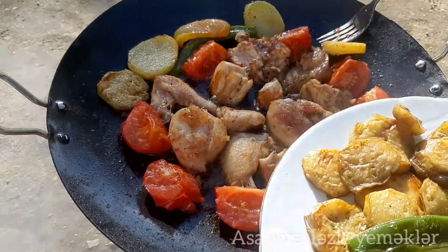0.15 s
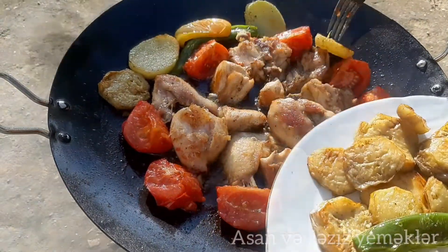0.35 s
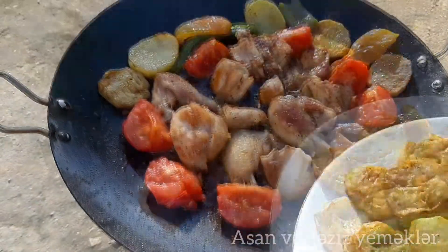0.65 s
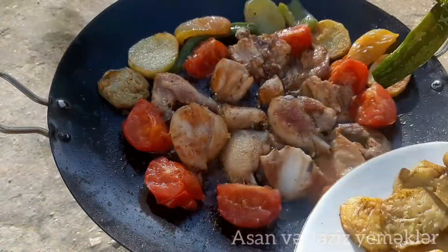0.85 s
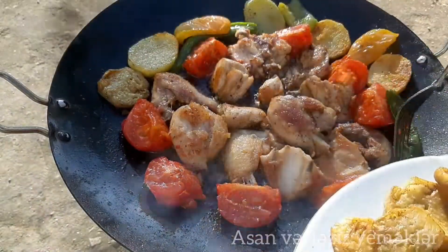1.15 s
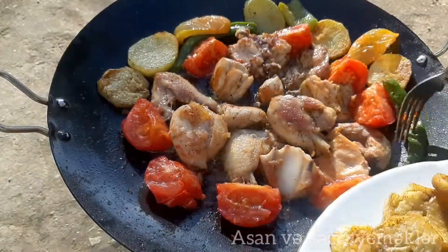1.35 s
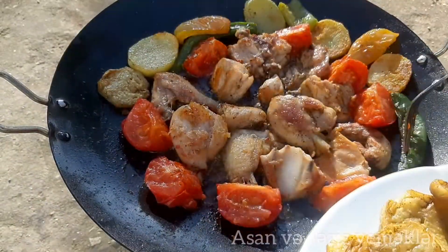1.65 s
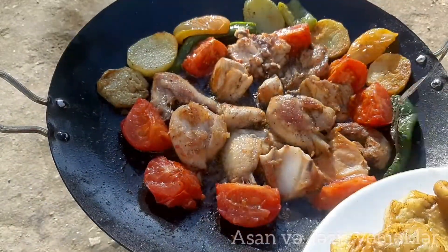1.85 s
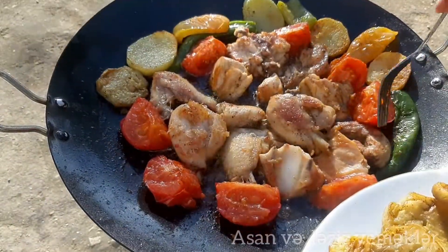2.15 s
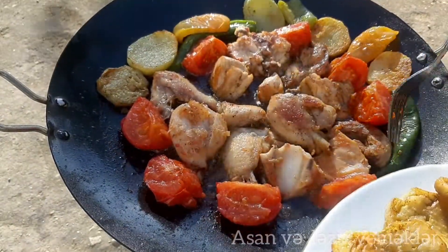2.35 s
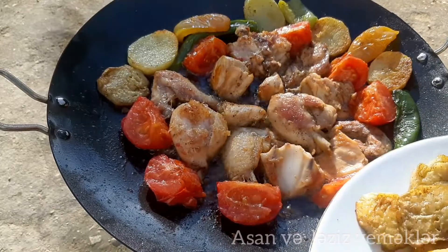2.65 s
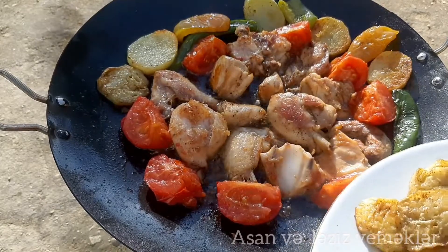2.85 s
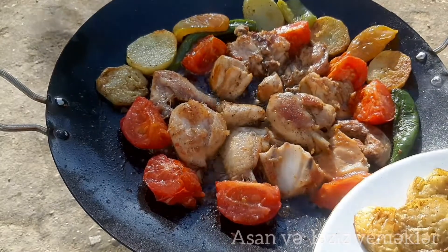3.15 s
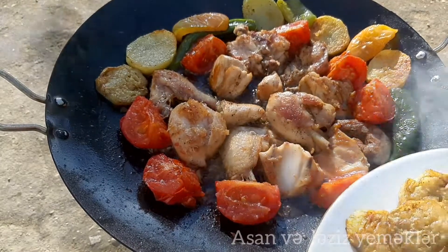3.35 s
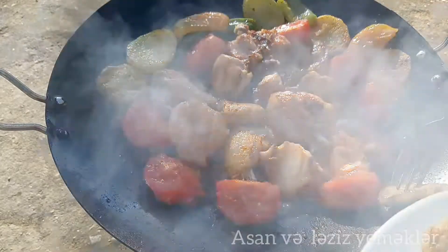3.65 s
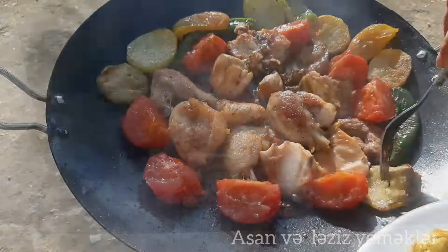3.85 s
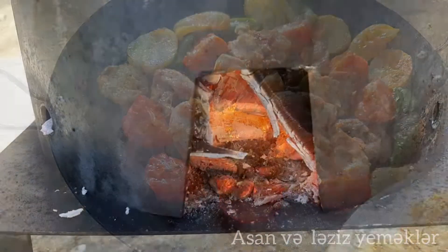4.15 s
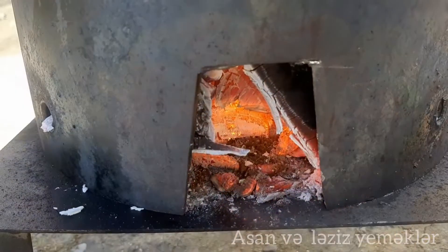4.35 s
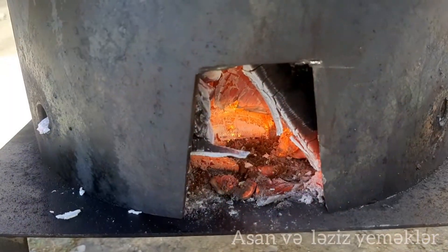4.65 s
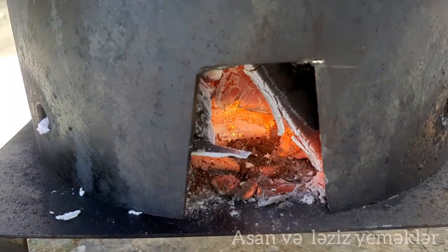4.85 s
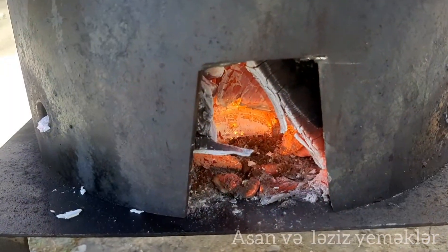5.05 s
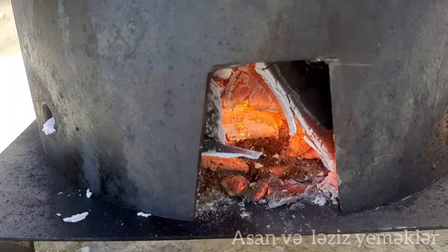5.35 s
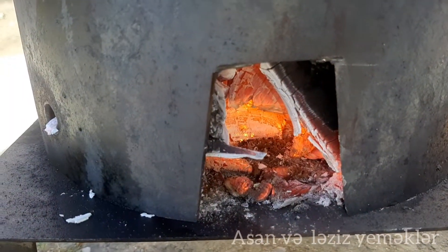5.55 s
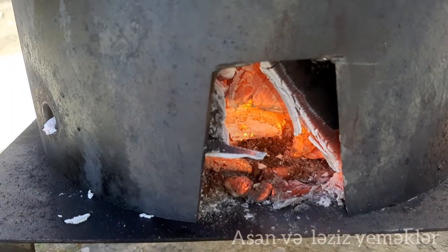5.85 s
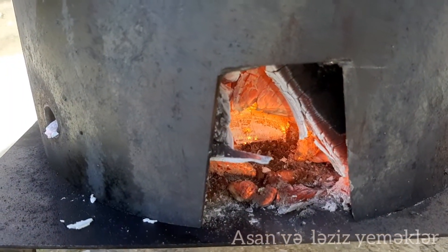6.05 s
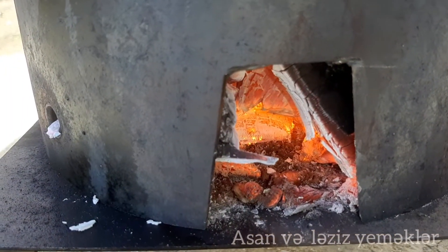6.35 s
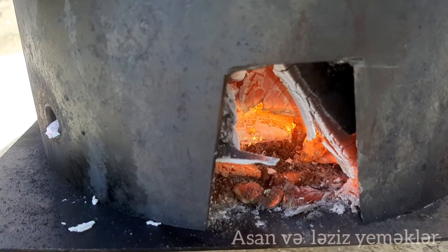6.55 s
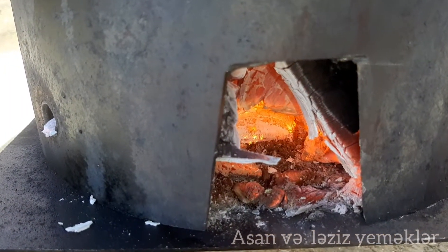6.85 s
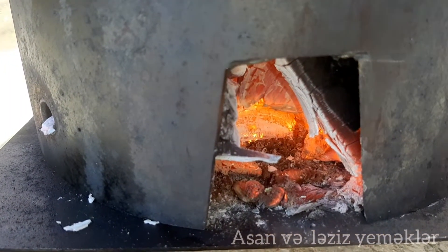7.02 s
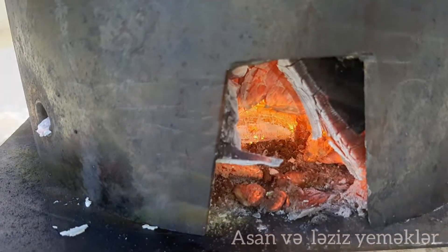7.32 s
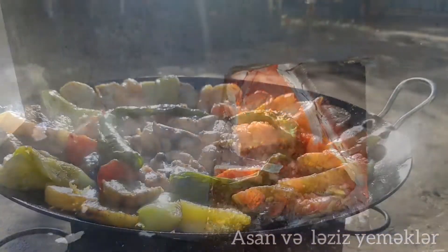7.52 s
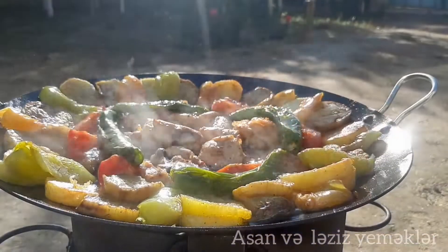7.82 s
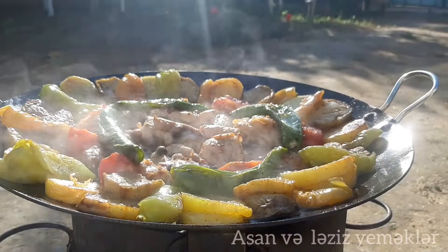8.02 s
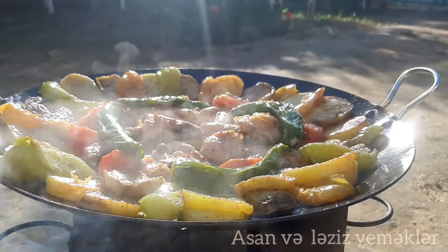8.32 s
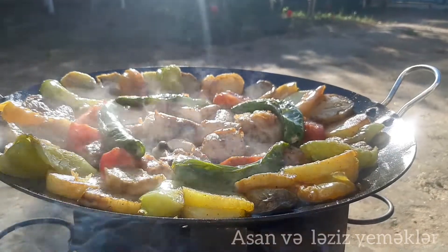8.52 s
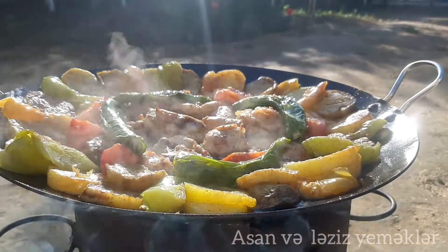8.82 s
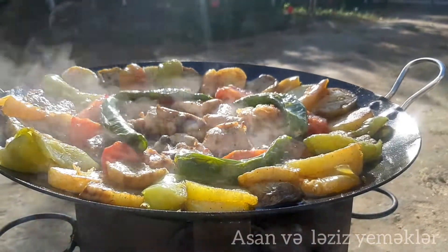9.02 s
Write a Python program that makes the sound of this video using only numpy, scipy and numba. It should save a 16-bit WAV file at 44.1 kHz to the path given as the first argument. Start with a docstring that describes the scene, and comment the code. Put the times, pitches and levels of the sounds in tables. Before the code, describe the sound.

Outdoors, close to a wide iron pan, oil sizzles thinly while a fork clanks once, hard, then knocks more softly. Pops cluster around the third second. The frying then comes forward, denser and crackly, with wind rumbling into the left of a handheld stereo microphone. At the end the gusts calm, the sizzle brightens and rises, and sharp spits stand out over a barely audible distant engine.

```python
"""Outdoors over a wood fire: food fries in an iron pan, heard by a two-port phone from three places in turn.
Steam bubbles in the oil are damped tones over a hiss that they lift; the louder ones are bursts of noise.
A fork taps the pan and a plate, exciting decaying modes; gusts send low pressure dips into each port.
Far off an engine drones as a harmonic series of gliding sines."""
import sys
import numpy as np
from scipy import signal
from scipy.fft import rfft, irfft, next_fast_len
from scipy.io import wavfile
from scipy.ndimage import uniform_filter1d
from numba import njit

SR = 44100
rng = np.random.default_rng(int(sys.argv[2]) if len(sys.argv) > 2 else 0)


def generate_wav(sig):
    """Save sig (samples, or channels by samples) to the path in sys.argv[1] as 16-bit PCM at SR."""
    pcm = np.round(np.clip(np.atleast_2d(sig).T, -1, 1) * 32767).astype(np.int16)
    wavfile.write(sys.argv[1], SR, pcm)


N = 404838

TOP_HZ = 15780  # upper band limit of the phone
SIZE = next_fast_len(N + SR // 4)  # transform length, with room for tails
HZ = np.arange(SIZE // 2 + 1) * SR / SIZE
TIME = np.arange(N) / SR


def undb(db):
    """Level to amplitude ratio: 20 dB per factor of ten."""
    return 10 ** (np.asarray(db) / 20)


def unit(x):
    """Normalisation to an effective (rms) value of 1."""
    return x / np.sqrt(np.mean(x ** 2))


def walk(rate):
    """Low-passed random process: levels held 1 / rate s, averaged twice; spread near 1."""
    hold = int(SR / rate)
    steps = np.repeat(rng.standard_normal(N // hold + 1), hold)
    return 1.3 * uniform_filter1d(uniform_filter1d(steps, hold), hold)[:N]


def causal(hz, db):
    """Minimum-phase principle: folding the cepstrum of a gain curve gives its causal response."""
    half = 1024
    grid = np.arange(half + 1) * SR / (2 * half)
    log_gain = np.interp(np.log(grid + 1), np.log(hz), db) * np.log(10) / 20
    cepstrum = irfft(log_gain)
    cepstrum[1:half] *= 2
    cepstrum[half + 1:] = 0
    return rfft(irfft(np.exp(rfft(cepstrum))), SIZE)


def add(out, x, s):
    """Superposition: x joins out at s seconds."""
    i = int(s * SR)
    out[..., i:i + x.shape[-1]] += x[..., :N - i]


@njit
def bubbles(at, step, fall, size, phase, length):
    """Damped oscillation: each bubble is a short decaying tone, its phase independent in three feeds."""
    out = np.zeros((3, length + 1024))
    for k in range(len(at)):
        turn = fall[k] * np.exp(1j * step[k])
        for feed in range(3):
            z = size[k] * np.exp(1j * phase[k, feed])
            for i in range(at[k], at[k] + min(1024, int(-5 / np.log(fall[k])))):
                out[feed, i] += z.imag
                z *= turn
    return out[:, :length]


def frying(strength_db, count=8000, spread_db=4, most_db=11, low_hz=500, span_oct=3.7, ring_ms=1.41,
           bubble_db=-7, puff_db=-12, puff_ms=9.6, reach_oct=2.0):
    """Shot noise: ringing bubbles over a hiss each lifts near its pitch; feeds shared, left only, right only."""
    chance = rng.random((count, 7))
    at = ((np.arange(count) + chance[:, 0]) * N / count).astype(np.int64)  # an even patter
    pitch = np.log2(low_hz) + span_oct * chance[:, 1]  # octaves above 1 Hz
    # many small bubbles, few large ones, none past a largest size
    size_db = most_db * np.tanh(-spread_db * np.log(chance[:, 2]) / most_db)
    size = undb(size_db + strength_db[at])
    ring = ring_ms * 2 ** (2 * chance[:, 3] - 1) * SR / 1000  # decay constant in samples
    step = 2 * np.pi * 2 ** pitch / SR
    phase = 2 * np.pi * chance[:, 4:]
    tones = bubbles(at, step, np.exp(-1 / ring), size / np.sqrt(ring), phase, N)

    hiss = rfft(rng.standard_normal((3, N)), SIZE)
    centres = np.arange(8, 14.1, 1.5)  # band centres, octaves above 1 Hz
    octave = np.clip(np.log2(HZ + 1), centres[0], centres[-1])
    seethe = walk(19)
    seethe = unit(seethe - uniform_filter1d(seethe, size=SR // 8))  # quick flutter, no slow surges
    out = undb(bubble_db + 0.28 * seethe) * unit(tones)
    for centre in centres:
        distance = np.clip((octave - centre) / (centres[1] - centres[0]), -1, 1)
        share = np.cos(np.pi / 2 * distance) ** 2
        nearness = np.exp(-((pitch - centre) / reach_oct) ** 2)
        puffs = np.bincount(at, (undb(puff_db) * size) ** 2 * nearness, N)
        # the energy of each puff dies away exponentially
        lift = np.sqrt(1 + signal.lfilter([1], [1, -np.exp(-1000 / (puff_ms * SR))], puffs))
        envelope = unit(lift * undb(0.81 * seethe + 0.3 * walk(40)))
        out = out + envelope * irfft(hiss * share, SIZE)[:, :N]
    return out


# Sizzle spectrum looking down on the pan: (f/Hz, left relative level/dB, right relative level/dB,
# likeness of the ports 0-1)
ABOVE_PAN = [(119, 4.5, 2, 0.5), (252, -4, -2, 0.64), (676, -2, -1, 1), (920, -8, -7.5, 0.73),
             (1310, -7.5, -7, 0.4), (1780, -4, -4.5, 0.4), (2190, -3.5, -5.5, 0.22), (2940, -6.5, -5, 0.03),
             (3670, 2, 0.5, 0.99), (5900, -9.5, -8.5, 0.18), (7530, -8.5, -10, 0), (8600, -17, -16.5, 1),
             (12000, -14.5, -16, 0.99), (15900, -18, -16.5, 0.98)]
# The same from below the rim: (f/Hz, left relative level/dB, right relative level/dB, likeness 0-1)
BY_FIREBOX = [(121, -1, -12, 1), (410, -11, -10.5, 0.66), (560, -17.5, -20.5, 0.77),
              (1145, -10.5, -11.5, 0.74), (1310, -14.5, -16.5, 0.17), (2040, 3, -5, 0.47),
              (2150, -12, -5, 0.61), (2530, -0.5, -1.5, 0.15), (3700, -2, -2, 0.035), (6070, -12, -5, 0.18),
              (7600, -9.5, -21, 0.12), (9050, -20, -30, 0.77), (11650, -20, -17.5, 1),
              (17400, -21, -27, 0.96)]
# The same level with the rim: (f/Hz, left relative level/dB, right relative level/dB, likeness 0-1)
BESIDE_PAN = [(120, -7.5, -4, 1), (317, -2.5, -7, 0.86), (660, -4.5, -3.5, 1), (870, -11.5, -10.5, 0.28),
              (1250, -8.5, -5, 0.92), (1950, -2, -5, 0.35), (2410, 3, 5, 0.26), (2710, 2.5, 3.5, 0.044),
              (3920, 1.5, 2, 0.95), (4870, -0.5, 7, 0.18), (7580, -5, -13, 0.089), (8850, -15.5, -44, 0.14),
              (10900, -14.5, -18, 0.83), (15700, -25.5, -26, 1)]
# Narrow resonances (+) and notches (-), one list a place: (f/Hz, width/Hz, level/dB)
NARROWS = [
    [(1620, 170, 3.5), (2980, 290, 6)],
    [(410, 51, 3.5), (1960, 350, 1), (2170, 220, -5), (2484, 88, 4.5), (2860, 160, -5), (4040, 71, 4.5),
     (5040, 210, 3), (7600, 190, -0.5)],
    [(1890, 96, -6), (3380, 540, -2), (4570, 480, 0.5), (5270, 350, -8), (6600, 400, 3.5)],
]
# Listening places: (dissolve start t/s, dissolve end t/s, left port delay/samples, burst level/dB,
# near echo delay/ms, echo gain, level/dB of the air above 8 kHz relative to the sizzle)
PLACES = [(-1, 0.75, -3.5, 1.5, 0.72, 0.0083, 0.5), (3.8, 4.3, -5, 1, 1.22, 0.029, 3),
          (7, 8.69, -8.5, -3, 1.76, 0.3, 6)]
# Overall course of the sizzle: (t/s, level/dB)
SIZZLE = [(0, -52), (.3, -55.5), (.55, -57), (.97, -52), (2.68, -49), (2.99, -47.5), (3.3, -49.5),
          (3.8, -50.5), (4.0, -49), (4.2, -44), (4.5, -39.5), (5.3, -41), (6.6, -39), (7.1, -41.5),
          (7.47, -45.5), (9.18, -37)]
AIR_HOLDS = 0.25  # share of each level swing that the air above 8 kHz does not follow
AIR_FLICKER_DB, AIR_FLICKER_PER_S = 1.5, 70  # quick flutter of that air


def sizzle():
    """Partial coherence: the frying, filtered and delayed to each port; places dissolve into each other."""
    start, end, lags, burst_db, echo_ms, echo, place_air_db = np.transpose(PLACES)
    enter = [np.clip((TIME - a) / (b - a), 0, 1) for a, b in zip(start, end)] + [0 * TIME]
    weight = [enter[k] - enter[k + 1] for k in range(3)]
    strength_db = sum(w * db for w, db in zip(weight, burst_db))
    shared, left, right = rfft(frying(strength_db), SIZE)

    level_db = np.interp(TIME, *np.transpose(SIZZLE))
    air_db = sum(w * db for w, db in zip(weight, place_air_db))
    air_db = air_db - AIR_HOLDS * (level_db - level_db.mean())
    air_db = air_db + AIR_FLICKER_DB * walk(AIR_FLICKER_PER_S)
    air = np.clip((HZ - 6500) / 2500, 0, 1)  # fades in around 8 kHz

    mix = 0
    colours = (ABOVE_PAN, BY_FIREBOX, BESIDE_PAN)
    for table, narrows, lag, ms, gain, w in zip(colours, NARROWS, lags, echo_ms, echo, weight):
        hz, left_db, right_db, alike = np.transpose(table)
        alike = np.clip(np.interp(HZ, hz, alike), 0, 1)
        # the delay between the ports holds below the top octave only
        late = np.exp(-2j * np.pi * HZ * lag / SR * (1 - air))
        at_left = np.sqrt(alike) * shared * late + np.sqrt(1 - alike) * left
        at_right = np.sqrt(alike) * shared + np.sqrt(1 - alike) * right
        pair = np.array([causal(hz, left_db) * at_left, causal(hz, right_db) * at_right])
        pair = pair * undb(sum(db / (1 + (2 * (HZ - f) / width) ** 2) for f, width, db in narrows))
        # a nearby surface sends a dull echo that combs the lower middle
        reflection = gain * np.exp(-2j * np.pi * HZ * ms / 1000 - (HZ / 4000) ** 2)
        pair = irfft(pair * (1 + reflection), SIZE)[:, :N]
        mix = mix + np.sqrt(w) * unit(pair)
    top = irfft(rfft(mix, SIZE) * air, SIZE)[:, :N]
    return undb(level_db) * (mix - top + undb(air_db) * top)


# chance snaps: level above the sizzle, spread of sizes, lowest pitch and range of pitches
SNAP_ABOVE_DB, SNAP_SPREAD_DB, SNAP_LOW_HZ, SNAP_SPAN_OCT = 12, -7, 1220, 3.84


def snaps(count=150):
    """Random point process: chance bursts as rows like POPS, until the second place has fully entered."""
    when, size, pitch = rng.random((count, 3)).T
    when = when * PLACES[1][1]
    hz = SNAP_LOW_HZ * 2 ** (SNAP_SPAN_OCT * pitch)
    colour = np.transpose(ABOVE_PAN)
    size_db = 6 * np.tanh(-SNAP_SPREAD_DB * np.log(size) / 6)
    colour_db = np.interp(hz, colour[0], colour[1:3].mean(axis=0))
    sizzle_db = np.interp(when, *np.transpose(SIZZLE))
    return list(zip(when, sizzle_db + SNAP_ABOVE_DB + size_db + colour_db, hz))


def peak(x):
    """Normalisation to a peak value of 1 at each port."""
    return x / np.abs(x).max(axis=-1, keepdims=True)


def around(hz, octaves, x):
    """Band-pass filtering: x within so many octaves either side of hz."""
    edges = np.minimum(hz * 2 ** np.array([-octaves, octaves]), TOP_HZ)
    return signal.sosfilt(signal.butter(3, edges, "band", fs=SR, output="sos"), x)


# Loud single bubbles: (t/s, peak level/dB, centre f/Hz)
POPS = [(0.559, -55, 600), (0.611, -47, 7600), (0.672, -48, 890), (0.815, -39, 1690), (0.8819, -40, 3150),
        (0.906, -42, 1200), (1.738, -44, 590), (1.787, -39, 660), (1.82, -34.5, 1570), (1.859, -41, 785),
        (1.999, -41, 10900), (2.09, -46, 7500), (2.297, -45, 900), (2.345, -42, 650), (2.372, -46, 8000),
        (2.39, -33.5, 2000), (2.452, -44, 7500), (2.646, -42, 7600), (2.708, -41.5, 7100),
        (2.816, -57, 11600), (2.837, -35.5, 1960), (2.871, -46, 3600), (2.8928, -37, 2600),
        (2.9372, -38, 3100), (2.946, -35.5, 3500), (2.974, -39, 3400), (2.981, -40, 3300),
        (3.003, -40, 3000), (3.015, -35, 3280), (3.0216, -35.5, 1400), (3.074, -37, 2500),
        (3.099, -36, 1380), (3.1512, -38.5, 1800), (3.2171, -38, 3650), (3.415, -44, 10300),
        (3.4814, -34, 2830), (3.4914, -52, 4500), (3.505, -38, 7000), (3.532, -42, 10900),
        (3.6471, -36.5, 1630), (3.736, -37, 7400), (3.937, -39, 2600), (4.125, -41, 1920),
        (4.2, -44.5, 1900), (4.472, -34, 1870), (4.503, -34, 1900), (4.546, -36.5, 1710),
        (4.6945, -32, 1980), (4.8234, -19.5, 2960), (4.869, -34, 1890), (4.913, -32, 4800),
        (5.017, -33, 1800), (5.113, -36, 1900), (5.1484, -35, 1950), (5.172, -31.5, 1820),
        (5.7806, -27.5, 2670), (6.233, -32, 2400), (6.263, -28, 1940), (6.283, -32, 1900),
        (6.3012, -28, 4900), (6.326, -31, 2500), (6.2996, -26.5, 2900), (6.3786, -30, 2700),
        (6.765, -34, 3130), (7.0656, -34, 1850), (7.3178, -33.5, 1860), (7.4034, -30, 1850),
        (7.4484, -38, 1190), (7.7567, -38, 4830), (7.943, -36, 7000), (8.0022, -43, 3000),
        (8.2975, -49, 2820), (8.4058, -42, 2400), (8.4417, -56, 4230), (8.547, -40, 2444),
        (8.7984, -28.5, 4250), (8.808, -31, 2820), (8.8992, -31, 5000), (9.0075, -34, 4800),
        (9.0336, -21, 5300), (9.0337, -31, 2800), (9.043, -28, 4940)]


def pops(near_oct=0.43, far_oct=0.26, near_ms=13, far_ms=14, alike=0.63, crack=4, skirt_db=-14, skirt_ms=4,
         thump_db=-5, thump_hz=670):
    """Impulsive excitation: each bubble is band noise with a wide tick; from above, low ones thump the pan."""
    out, t = np.zeros((2, N)), np.arange(2000) / SR

    def fade(ms):
        """Exponential decay: 60 dB in ms."""
        return np.exp(-np.log(1000) * t * 1000 / ms)

    for s, db, hz in list(POPS) + snaps():
        above = s < PLACES[1][0]
        width_oct, ring_ms = (near_oct, near_ms) if above else (far_oct, far_ms)
        both, *own = rng.standard_normal((3, len(t)))
        both[0] = crack  # the skin of the bubble tears at once
        tear = alike * both + (1 - alike) * np.array(own)
        burst = peak(around(hz, width_oct, tear * fade(ring_ms)))
        burst += undb(skirt_db) * peak(around(hz, 1.1, tear * fade(skirt_ms)))
        if above and hz < 3150:
            burst += undb(thump_db) * np.sin(2 * np.pi * thump_hz * t) * fade(19)
        add(out, peak(burst) * undb(db), s)
    return out


# Modes of the pan, struck at the rim: (f/Hz, width/Hz, relative level/dB)
PAN_RIM = [(307, 67, -13), (506, 110, -17), (710, 120, -13), (915, 57, 2), (1073, 120, 5), (1390, 69, -16),
           (1615, 27, -10.5), (1910, 61, -3.5), (2500, 115, -1), (2770, 130, -1.5), (3430, 110, 1),
           (3900, 90, 1.5), (4270, 80, -13), (5270, 130, -1), (5600, 120, -1), (5820, 100, 3.5),
           (5950, 110, -4), (6550, 95, -4), (7000, 88, -5), (7630, 120, 3.5), (7780, 110, 6.5),
           (9300, 130, -3), (11220, 98, -10), (12350, 120, -3), (12800, 200, -11), (13600, 150, 5),
           (14100, 120, 0), (15470, 170, -1)]
# Modes of its belly: (f/Hz, width/Hz, relative level/dB)
PAN_BELLY = [(2940, 110, -1.5), (3370, 110, -3), (4160, 51, 0), (4720, 200, -4), (5750, 88, -8),
             (6380, 110, 3.5), (7700, 74, -6), (7750, 100, -12), (8750, 110, -16), (8900, 97, -17),
             (11240, 96, -13.5), (12720, 85, -12), (13080, 110, -11), (14780, 140, -15)]
# Low modes of its bowl: (f/Hz, width/Hz, relative level/dB)
PAN_BOWL = [(328, 74, 8.5), (462, 61, 3.5), (815, 59, 3.5), (1020, 59, -7), (1340, 90, -14)]
# Broad modes of its edge: (f/Hz, width/Hz, relative level/dB)
PAN_EDGE = [(467, 100, 3), (637, 120, 0.5), (1100, 280, -11), (2560, 200, -10), (3680, 190, -2),
            (3100, 300, -6), (5430, 300, -12), (6720, 250, -12)]
# Modes of the plate: (f/Hz, width/Hz, relative level/dB)
PLATE = [(1760, 40, -3), (3240, 500, 10), (3650, 400, 5), (6900, 150, 6.5)]
# Modes of a fork tine: (f/Hz, width/Hz, relative level/dB)
TINE = [(3160, 100, 4), (6180, 110, -10)]
# Fork contacts: (t/s, level/dB over the loudest 10 ms, softness/ms, length of the rub/ms,
# after-sound level/dB before it is dulled, modes of what is struck)
TAPS = [(0.2419, -15, 0.011, 1, -31.5, PAN_RIM), (0.340, -51, .4, 3.1, -27, PLATE),
        (1.342, -27.5, 0.016, 3, -34, PAN_BELLY), (1.3428, -30.5, 0.065, 3.7, -38, PAN_BOWL),
        (1.508, -36, 0.03, 1.9, -35, PAN_EDGE), (2.952, -42.5, 0.088, 36, -40, PLATE),
        (3.758, -40.5, 0.078, 12, -26, TINE)]


def taps(chatter_db=-28, chatter_ms=3, wash_ms=17, blur_db=-11, slip=0.63, lag_ms=0.042):
    """Modal superposition: a fork strike or rub drives decaying modes, then chatter and a diffuse tail."""
    out, t = np.zeros((2, N)), np.arange(SR // 8) / SR
    for s, db, soft_ms, rub_ms, wash_db, body in TAPS:
        hz, width, mode_db = np.array(body).T[..., None]
        # while the contact lasts each mode swells, unevenly as the metal slips; then it dies away
        push = np.sin(np.pi * np.clip(t * 1000 / rub_ms, 0, 1)) ** 2
        swell = signal.fftconvolve(np.exp(-np.pi * width * t), push[None], axes=1)[:, :len(t)]
        slips = rng.standard_normal((len(hz), len(t) // 64 + 1)).repeat(64, axis=1)[:, :len(t)]
        swell = undb(mode_db) * swell * (1 + slip * push * uniform_filter1d(slips, size=32))
        # modes below 10 kHz oscillate a little later at the left port
        left_time = np.maximum(t - (hz < 10000) * lag_ms / 1000, 0)
        ring = np.array([(swell * np.sin(2 * np.pi * hz * u)).sum(axis=0) for u in (left_time, t)])
        # tail noise: lows and top alike at both ports, the middle different
        jolts = rng.standard_normal((4, len(t)))
        apart = jolts[:2] - jolts[2]
        tail_noise = jolts[2] + uniform_filter1d(apart, size=4) - uniform_filter1d(apart, size=21)
        fade = undb(chatter_db) * np.exp(-t * 1000 / chatter_ms) * tail_noise
        # the after-sound of the ground and stove is dull
        fade += undb(wash_db) * np.exp(-t * 1000 / wash_ms) * uniform_filter1d(tail_noise, size=3)
        ring += signal.fftconvolve(ring, fade, axes=1)[:, :len(t)]
        # bright noise follows the envelope of the ring
        blur = signal.lfilter([1, -1], [1, -.85], jolts[3])
        ring += undb(blur_db) * uniform_filter1d(np.abs(ring), size=64, origin=31) * blur
        keep = np.exp(-1000 / (soft_ms * SR))  # a softer contact pushes longer and dulls the ring
        ring = signal.lfilter([1 - keep], [1, -keep], ring)
        # the struck body radiates little below its lowest mode
        ring = signal.sosfilt(signal.butter(3, 0.9 * hz.min(), "high", fs=SR, output="sos"), ring)
        loudest = np.sqrt(uniform_filter1d(np.mean(ring ** 2, axis=0), size=SR // 100).max())
        add(out, ring * undb(db) / loudest, s)
    return out


# Steady wind on the ports: (t/s, left level/dB, right level/dB)
GUSTS = [(0, -62, -59), (.4, -54.5, -60), (.6, -82, -80), (.9, -48, -53), (1.25, -51, -54), (1.6, -59, -55),
         (2.35, -62, -58.5), (2.6, -57, -54.5), (3.15, -60, -53.5), (3.6, -74, -70), (4.15, -44, -57),
         (4.35, -41, -59), (4.46, -51, -60), (4.54, -29.5, -57), (4.62, -49, -56), (4.68, -40, -51.5),
         (4.8, -39.5, -51), (4.93, -36.5, -67), (5.01, -28.5, -63), (5.09, -47, -55), (5.19, -31, -57),
         (5.25, -39, -59), (5.35, -35.5, -54), (5.46, -37, -53), (5.55, -29, -52), (5.65, -38.5, -54),
         (5.85, -43.5, -61), (6.3, -42.5, -63), (6.55, -70, -57), (7.5, -79, -66), (9.18, -87, -79)]
# Single strong eddies: (t/s, dip level/dB at the port hit harder before the bass cut,
# left minus right level/dB)
BUFFETS = [(0.865, -31, -16), (0.958, -26, 4), (1.283, -17, 5.5), (1.303, -16.5, -9), (1.324, -21, 3),
           (1.339, -20, -16), (1.629, -29.5, -18), (1.704, -32, -22), (1.86, -30, -3), (1.893, -27.5, 0),
           (2.082, -30, -1), (2.822, -32, -2), (2.833, -34, 1), (3.017, -31, -6), (3.215, -33, 0),
           (3.734, -32, 14), (3.758, -31, 16), (4.216, -26, 20), (4.29, -25.5, 21), (4.517, -19.5, 23),
           (4.543, -22, 27), (4.67, -23.5, 31), (4.958, -20, 22), (4.976, -17, 52), (5.018, -22, 20),
           (5.044, -16.5, 22), (5.209, -16, 25), (5.421, -12.5, 19), (5.49, -17, 16.5), (5.538, -8, 13.5),
           (5.555, -11, 24), (5.575, -15, 22), (5.764, -19, 27), (5.881, -16.5, 22), (5.963, -19.5, 24),
           (6.104, -18, 27), (6.287, -26, 22), (6.566, -24, 22), (6.648, -17.5, 27), (6.926, -28, 15),
           (7.244, -26, 10.5), (7.685, -29.5, 9)]
BUFFET_LAG_MS, ONE_PORT_DB = 2.14, 13.5  # the lee port is hit later, and not at all from this imbalance


def wind(count=900, spread_db=1.0, eddy_ms=2.13, buffet_ms=1.5, cut_hz=80, murmur_db=-6):
    """Turbulent pressure: eddies suck briefly at each port; zero-phase bass cut swells around every dip."""
    s, *level_db = np.transpose(GUSTS)
    at, db, pan_db = np.transpose(BUFFETS)
    t = np.arange(-400, 401) / SR
    cut = signal.butter(2, cut_hz, "high", fs=SR, output="sos")

    def dips(impulses, ms):
        """Linear superposition: each impulse becomes a bell-shaped pressure dip."""
        return signal.sosfiltfilt(cut, signal.fftconvolve(impulses, -np.exp(-(t * 1000 / ms) ** 2), "same"))

    out = np.zeros((2, N))
    for port in range(2):
        when, size = rng.random((count, 2)).T
        size_db = 10 * np.tanh(-spread_db * np.log(size) / 10)
        eddies = unit(np.bincount((when * N).astype(int), undb(size_db), N))
        eddies = eddies + undb(murmur_db) * rng.standard_normal(N)
        eddies = eddies * undb(4.0 * np.tanh(walk(18) / 1.3))
        steady = unit(dips(eddies, eddy_ms))
        lee_db = np.maximum(0, pan_db * (2 * port - 1))  # how much weaker this port is hit
        hit = at + (lee_db > 0) * BUFFET_LAG_MS / 1000
        strength = (lee_db < ONE_PORT_DB) * undb(db - lee_db)
        strong = dips(np.bincount((hit * SR).astype(int), strength, N), buffet_ms)
        out[port] = steady * undb(np.interp(TIME, s, level_db[port])) + strong
    return out


# Far engine, its strongest line: (t/s, f/Hz, level/dB)
DRONE = [(7.92, 122.6, -68), (8.1, 112.6, -59.5), (8.25, 112.2, -64), (8.42, 116.4, -81),
         (8.6, 122.3, -52.5), (8.92, 125.7, -66.5), (9.07, 125.9, -58), (9.18, 128, -81)]


def drone():
    """Harmonic series: the second order of a far engine is loudest; first, third and fourth lie under it."""
    s, hz, db = np.transpose(DRONE)
    turn = np.pi * np.cumsum(np.interp(TIME, s, hz)) / SR  # phase of the first order
    orders = np.sin(2 * turn) + undb(-25) * np.sin(turn)
    orders = orders + undb(-9.5) * np.sin(3 * turn) + undb(-11.5) * np.sin(4 * turn)
    return np.sqrt(2) * orders * undb(np.interp(TIME, s, db, left=-120))


def scene():
    """Superposition of all sources at the two ports."""
    return sizzle() + pops() + taps() + wind() + drone()


def record(dry):
    """Band limiting: the phone trims the deepest bass and cuts the top."""
    trimmed = signal.sosfilt(signal.butter(2, 40, "high", fs=SR, output="sos"), dry)
    return signal.sosfilt(signal.ellip(10, .2, 80, TOP_HZ, fs=SR, output="sos"), trimmed)


dry = scene()
out = record(dry)
generate_wav(out)
```